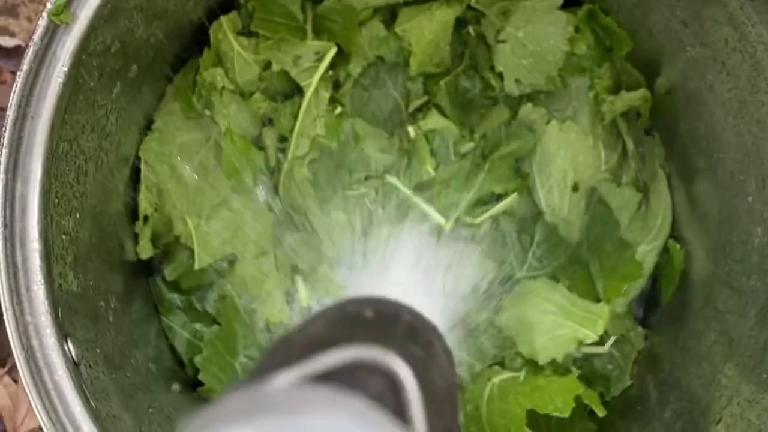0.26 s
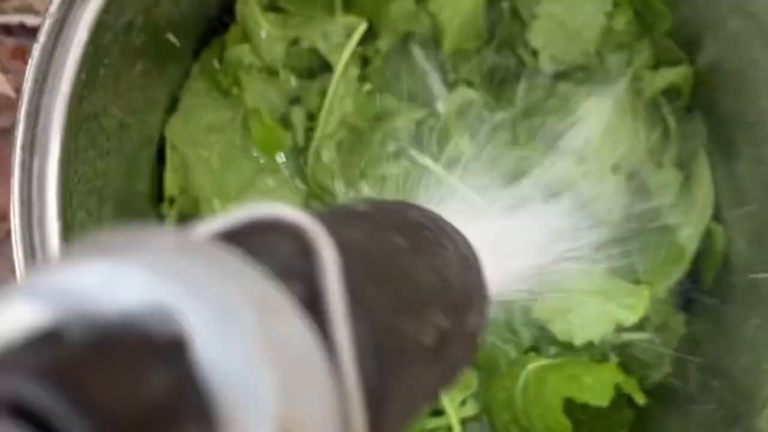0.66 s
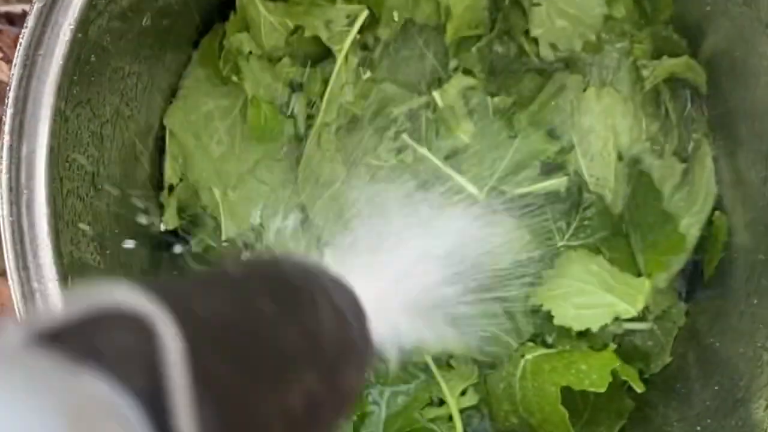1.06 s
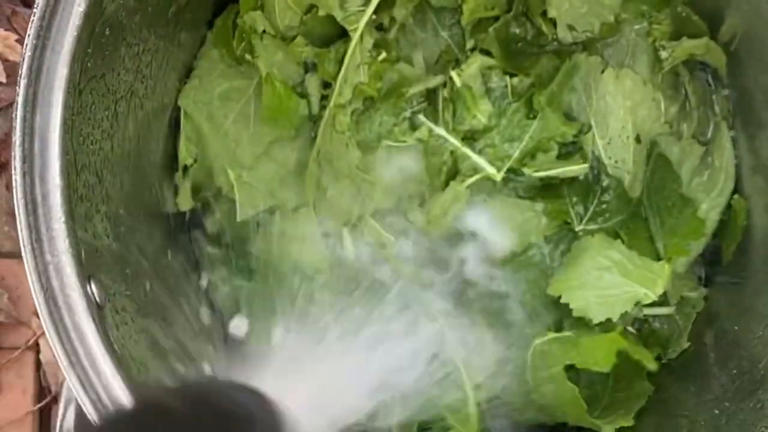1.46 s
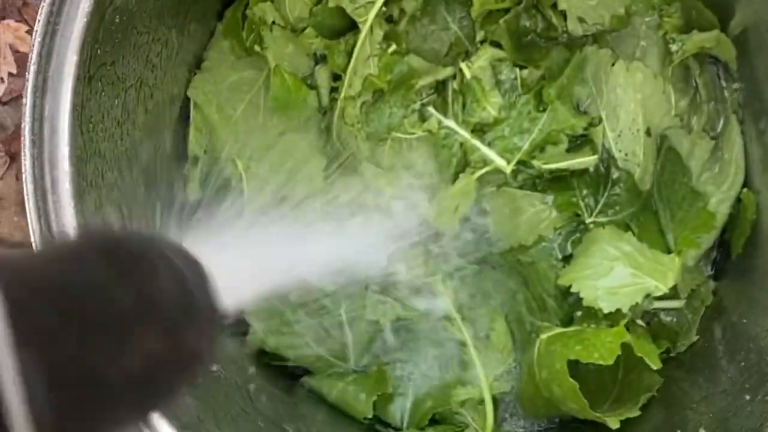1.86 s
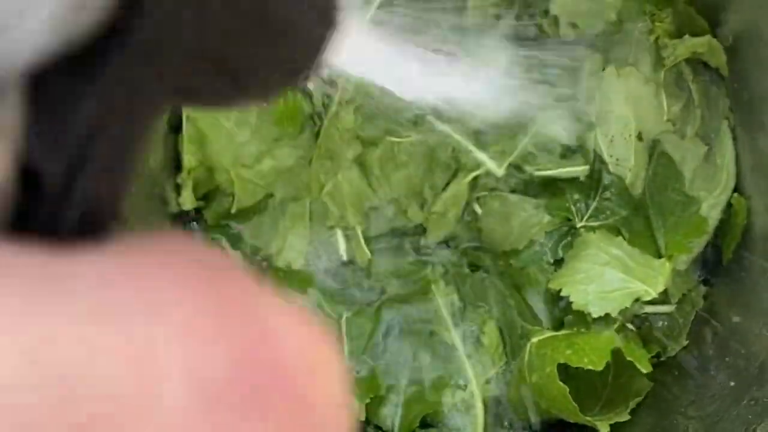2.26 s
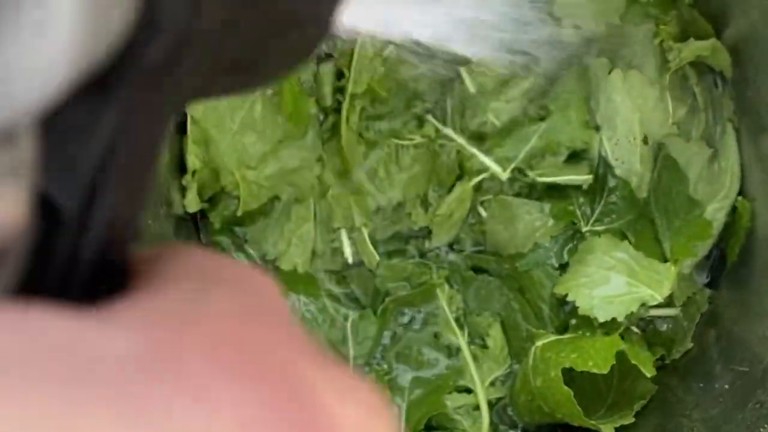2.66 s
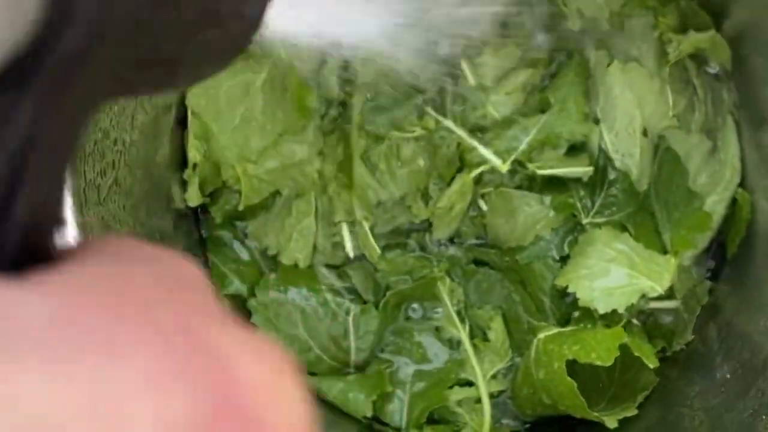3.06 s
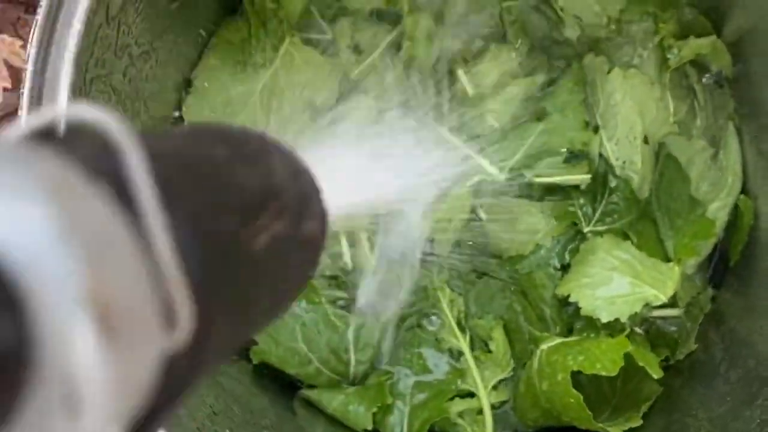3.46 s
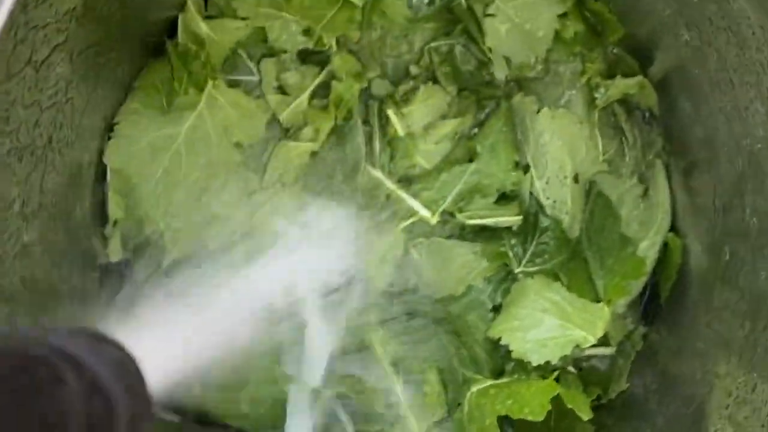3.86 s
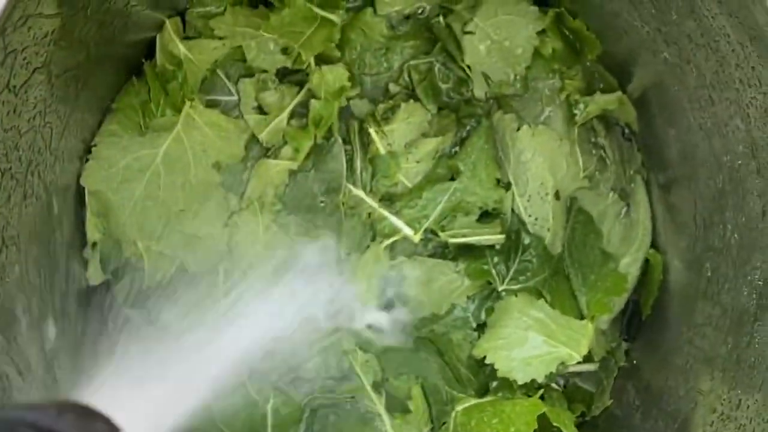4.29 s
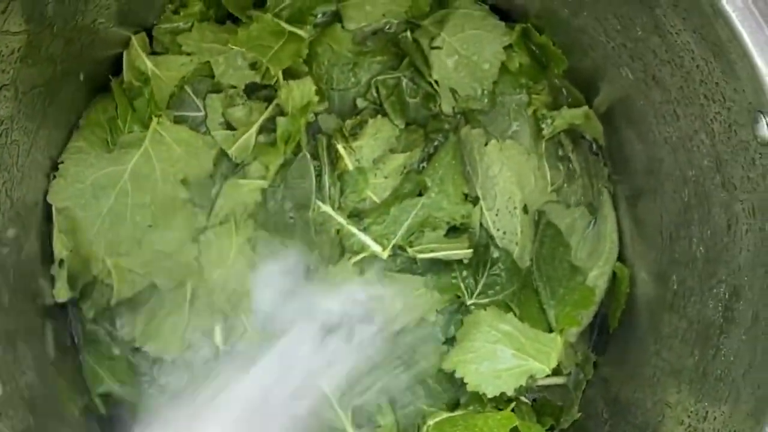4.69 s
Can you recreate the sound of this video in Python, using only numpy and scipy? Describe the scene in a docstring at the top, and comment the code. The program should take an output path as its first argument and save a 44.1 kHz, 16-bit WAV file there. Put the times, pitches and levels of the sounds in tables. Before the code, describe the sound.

A garden hose nozzle hisses steadily up close, its spray pattering on wet leaves and gurgling into water in a large metal pot.

```python
"""Outdoors, within arm's reach: a garden hose sprays a large metal pot full of leaves and water.
The nozzle hisses as dense coloured impacts; drops tick, trap ringing bubbles and make leaves flap and rattle.
Churning water excites the air modes of the pot, and stray spray cracks on its wall.
Low noise and short swings of pressure form the draught of the jet, which buffets a two-port microphone."""
import sys
import numpy as np
from scipy import signal
from scipy.fft import rfft, irfft, next_fast_len
from scipy.io import wavfile
from scipy.ndimage import uniform_filter1d

SR = 44100
rng = np.random.default_rng(int(sys.argv[2]) if len(sys.argv) > 2 else 0)


def to_wav(sig):
    """Store sig (one row per channel, or 1-D mono) as 16-bit WAV at the path in sys.argv[1].

    Samples outside -1..1 are clipped; the rate is SR.
    """
    pcm = np.clip(np.atleast_2d(sig), -1, 1) * 32767
    pcm = np.round(pcm).astype(np.int16)
    wavfile.write(sys.argv[1], SR, pcm.T)  # frames by channels


N = 217633
TIME = np.arange(N) / SR  # seconds
SIZE = next_fast_len(N + SR // 10)  # FFT length in samples

# Nozzle turning past the microphone: time_s, hiss_db, mist_db (mist before its flicker and trim)
NOZZLE_LEVELS = [(0, -34.3, -33.7), (.6, -32.5, -33.2), (.83, -31.7, -31), (1.25, -34.2, -34),
                 (2.1, -32.4, -33.8), (2.7, -35, -31.8), (3.15, -35, -33.6), (3.7, -33.3, -36.6),
                 (4.0, -30.8, -36), (4.25, -33, -38), (4.55, -32.4, -35.2), (4.93, -34.5, -38)]
# Brightest band of the hiss as the nozzle turns: time_s, centre_hz
HISS_CENTRE = [(0, 6550), (.7, 6800), (1.0, 5800), (1.3, 7400), (1.6, 6600), (2.3, 8100), (3.1, 8100),
               (3.5, 7200), (4.9, 7300)]
# Relative spectrum of the hiss: frequency_hz, level_db_per_hz
HISS_SPECTRUM = [(2000, -31), (3900, -16), (4800, -4), (5700, -.8), (7500, 0), (8700, -1), (10100, -9),
                 (11000, -10.5), (13000, -19)]
# Relative spectrum of the fine mist: frequency_hz, level_db_per_hz
MIST_SPECTRUM = [(6000, -28), (8800, -15), (10200, -14), (11200, -11.8), (12800, -12.5), (13900, -7.5),
                 (14800, -1.5), (15700, 1.5), (16100, -40)]
# Brief sizzles of the nozzle: start_s, length_s, level_db
SIZZLES = [(.62, 0.011, -48), (.865, 0.024, -34.5), (1.06, .025, -30.5), (1.5, .42, -50.5),
           (3.39, 0.036, -32)]
SIZZLE_EDGE_S, SIZZLE_HZ = 0.033, 5530
# The jet grazes the wall and spits: start_s, level_db, decay_s
SPITS = [(3.297, -22, .006), (3.306, -24, .006), (3.317, -27.5, .045)]
# Relative spectrum of a spit: frequency_hz, level_db_per_hz
SPIT_SPECTRUM = [(4300, -22), (5900, 0), (7500, -1), (8120, 6), (9400, -4), (11300, -7), (12020, 0),
                 (12700, -9), (15500, 5)]

# How hard the jet bears on the leaves: time_s, patter_db
ON_LEAVES = [(0, -42), (.4, -42.5), (.7, -37), (1.05, -40.5), (1.3, -36), (1.92, -37), (2.05, -42.5),
             (2.26, -35.5), (2.4, -38.5), (2.8, -33), (3.05, -39), (3.16, -39.5), (3.25, -34.5),
             (3.35, -38), (4.2, -45), (4.93, -44.5)]
# Relative spectrum of drops on leaves: frequency_hz, level_db_per_hz
PATTER_SPECTRUM = [(200, -24), (330, 5.5), (700, 2.5), (1150, 3), (2000, -8), (2550, 1), (3000, 4),
                   (4200, 3.5), (5200, -20), (8000, -9.5), (14000, -18)]
# A leaf is caught by the jet and flaps: start_s, length_s, level_db
FLAPS = [(.47, 0.2, -34.5), (.765, 0.041, -30.5), (.8, .3, -38.5), (1.25, 0.096, -44), (2.06, 0.26, -35.5),
         (2.22, 0.047, -26.5), (2.345, 0.057, -27), (2.42, .44, -35), (2.88, 0.27, -39.5),
         (3.22, 0.1, -32.5)]
# Relative spectrum of flapping: frequency_hz, level_db_per_hz
FLAP_SPECTRUM = [(300, -29.5), (550, -6.5), (780, 1), (920, 0.5), (1080, -8), (1350, -11.5), (2500, -20)]
FLAP_EDGE_S, FLAP_REST_DB = 0.014, -44.5  # time to catch and let go; flutter of the other leaves
# The jet hits a leaf square on and it rattles: start_s, length_s, level_db, pitch_hz
RATTLES = [(0.677, 0.027, -36, 3065), (1.54, 0.06, -38, 2680), (1.688, 0.014, -37, 2804),
           (1.828, 0.1, -38.5, 3440), (2.223, 0.033, -39, 4120), (2.625, 0.045, -37.5, 3140),
           (2.772, 0.039, -40.5, 2770), (2.844, .2, -39.5, 2540), (3.201, 0.1, -38.5, 3050)]
RATTLE_EDGE_S, RATTLE_WIDTH_HZ = 0.032, 1400  # width of each of two resonances in series

# How hard the jet digs into the pool: time_s, churning_db
IN_POOL = [(0, -40.5), (.8, -38.5), (1.3, -42.5), (2.3, -37), (2.8, -40), (3.12, -55), (3.35, -42.5),
           (3.9, -37), (4.93, -40)]
# Air mode sounded by the churning: frequency_hz, width_hz
CHURN_MODE = (560, 134)
# Relative spectrum of splashes: frequency_hz, level_db_per_hz
SPLASH_SPECTRUM = [(200, -28.5), (700, -15.5), (1100, 0), (1260, -5), (1470, 2.5), (1640, 5), (1850, 6),
                   (2150, -1.5), (2550, 2.5), (3200, -12.5), (5000, -38.5)]
SPLASH_DB, SPLASH_FOLLOWS = -38.5, 0.17  # level at mean churning; share of the churning's swing
# Ringing of the pot under the splashing: frequency_hz, width_hz, level_db
RING_MODES = [(1800, 75, 0), (1910, 90, -1.5), (2100, 90, -3.5)]
# Level of that ringing: time_s, level_db
RING_LEVEL = [(0, -41.5), (.65, -45), (1.2, -40), (1.5, -43), (1.9, -41.5), (3.2, -47), (3.6, -40),
              (4.0, -42), (4.27, -38.5), (4.5, -42), (4.93, -41)]
# The jet breaks through to open water: start_s, length_s, level_db, pitch_hz
SURGES = [(0.47, .095, -35.5, 1460), (0.784, 0.1, -40, 1583), (1.826, 0.028, -36, 1875),
          (2.502, 0.014, -31.5, 1580), (4.165, 0.06, -40, 1770), (4.2, 0.17, -41.5, 1880),
          (4.626, 0.27, -40.5, 1510)]
SURGE_EDGE_S, SURGE_WIDTH_HZ = .025, 270
BUBBLE_RISE = 0.05  # half the share by which pitch climbs during a 60 dB decay

# Pitch of the pot's hollow note: time_s, pitch_hz
HOLLOW_PITCH = [(0, 260), (.3, 276), (1.2, 253), (2.0, 253), (2.7, 272), (4.93, 268)]
HOLLOW_DB, HOLLOW_FOLLOWS = -48.5, 0.38  # level at mean churning; share of the churning's swing
# Swells of the hollow note: start_s, length_s, level_db
BOOMS = [(.02, 0.062, -36), (.24, 0.071, -38), (1.0, 0.18, -49.5), (1.21, 0.04, -39.5),
         (2.015, 0.013, -40.5), (3.82, 0.37, -50.5), (4.63, 0.087, -44)]
BOOM_EDGE_S = 0.037

# The draught of the jet sweeps over the microphone: start_s, length_s, level_db
GUSTS = [(0, .03, -37.5), (.12, 0.42, -38.5), (.62, 0.21, -42.5), (1.66, 0.084, -39), (1.9, 0.19, -42.5),
         (2.14, 0.089, -39.5), (2.29, 0.11, -40), (2.5, 0.033, -44), (2.82, 0.19, -46.5), (2.95, .11, -35),
         (3.2, 0.17, -51), (3.88, 0.29, -36), (4.2, 0.37, -36), (4.68, 0.21, -38)]
GUST_EDGE_S, CALM_DB = 0.011, -50  # rise and fall; level between gusts
# Relative spectrum of buffeting: frequency_hz, level_db_per_hz
RUMBLE_SPECTRUM = [(15, -53.5), (28, -21.5), (42, 1), (62, 11.5), (90, 3.5), (140, -9.5), (200, -21),
                   (400, -27), (1000, -57)]
# Puffs of air on the microphone: centre_s, level_db, length_s, pitch_hz
PUFFS = [(.205, -29.5, .028, 110), (.368, -29, .03, 62), (.665, -34, .025, 65), (.74, -35, .025, 70),
         (1.115, -38.5, .018, 58), (1.2, -37, .018, 62), (1.422, -29.5, .012, 100), (1.561, -29, .015, 80),
         (1.627, -36, .02, 85), (1.803, -31.5, .016, 62), (2.138, -33, .016, 75), (2.226, -31.5, .013, 106),
         (3.025, -36, .035, 85), (3.129, -25.5, .011, 84), (3.155, -33, .018, 48), (3.632, -36, .014, 100),
         (3.76, -39, .016, 65), (3.985, -29, .03, 92), (4.505, -31.5, .025, 60), (4.806, -32, .022, 90)]
# Relative spectrum of the rush in a puff: frequency_hz, level_db_per_hz
PUFF_SPECTRUM = [(25, -15), (55, -6), (115, -1), (190, 1), (380, -8), (600, -18), (1200, -26)]
THUD_DB, RUSH_DB = -12.5, -6  # thuds against their gust; rush against its puff
PUFF_FALL = .28  # fall in log pitch (base e) per puff length

# Single heavy drops: start_s, level_db (before a common gain), pitch_hz
DROPS = [(.532, -21, 1640), (.786, -21, 1950), (.836, -22, 1650), (.971, -22, 1750), (1.043, -20.5, 1790),
         (1.207, -20.5, 1790), (1.266, -22, 985), (1.309, -21.5, 1700), (1.435, -23, 1890),
         (1.463, -20.5, 2600), (1.5495, -20.5, 2810), (1.589, -19.5, 2850), (1.619, -19.5, 2610),
         (1.688, -21, 2910), (1.854, -22, 1910), (1.860, -20.5, 2120), (1.902, -21, 3700),
         (1.917, -22, 3510), (1.988, -21.5, 1870), (2.168, -23, 1440), (2.502, -21, 1640),
         (2.638, -22, 3710), (2.788, -20, 2910), (2.810, -18.5, 3235), (3.236, -18.5, 2590),
         (3.622, -21.5, 2000), (3.630, -23, 1920), (4.175, -20.5, 1895), (4.193, -19, 1770),
         (4.212, -22, 1830), (4.243, -22, 1790), (4.278, -22, 1860), (4.336, -15, 1850)]
SNAP_CYCLES = 18  # nominal cycles in a 60 dB decay
SPRAY_DB, SPRAY_DECAY_S = -16.5, 0.0022  # droplets thrown off, against level_db of their drop
# Gulps of trapped air: start_s, level_db, pitch_hz
GULPS = [(.572, -20.5, 818), (.756, -20, 900), (.761, -19, 824), (.761, -22, 540), (.770, -22, 576),
         (1.475, -19, 490), (1.609, -23, 554), (1.876, -21.5, 570), (1.884, -25, 480), (2.215, -23.5, 942),
         (2.224, -20, 834), (2.238, -17.5, 856), (2.272, -18.5, 824), (2.347, -20.5, 840),
         (2.358, -19, 974), (2.368, -17.5, 834), (2.392, -20.5, 813), (2.499, -24, 511),
         (2.665, -23.5, 694), (2.827, -22.5, 748), (3.236, -23, 877), (3.277, -22, 872)]

# Stray spray sweeps over the bare pot wall: start_s, length_s, level_db (before a common gain)
WALL_SWEEPS = [(1.4, 0.47, -36.5), (2.72, 0.52, -37)]
# Relative spectrum of drops on bare metal: frequency_hz, level_db_per_hz
WALL_SPECTRUM = [(400, -10.5), (1300, 10), (2800, 14), (5000, -6.5), (7500, 1.5), (10500, -4.5),
                 (13000, -5), (15500, -3.5), (16500, -24)]
WALL_EDGE_S, WALL_REST_DB = 0.029, -56  # rest level also before the common gain

# Phase between the microphone ports: frequency_hz, left_lead_rad
PORT_PHASE = [(30, 0), (300, .3), (690, .6), (1100, 0), (2000, -.25), (2580, -.9), (3100, -.2),
              (3900, -.35), (4740, -1.3), (5080, -1.9), (5300, -np.pi), (13000, -np.pi), (15300, -2.5)]
# Level between the ports: frequency_hz, left_minus_right_db
PORT_BALANCE = [(100, 0), (480, .7), (750, 4), (1280, 5.5), (1700, 1), (2900, .3), (3600, 2), (5000, 0)]
# Coherence for equally strong direct and scattered sound: frequency_hz, likeness_0_to_1
PORT_LIKENESS = [(50, .98), (150, .94), (300, .98), (900, .97), (1900, .92), (3200, .86), (4300, .55),
                 (5000, .7), (5600, 1), (13000, 1), (14500, .8)]
CUTOFF_HZ = 15750


def from_db(db):
    """Level definition: an amplitude ratio is ten to the power of decibels over twenty."""
    return 10 ** (np.asarray(db) / 20)


def rms_one(x):
    """Power normalisation: division by the root mean square."""
    return x / np.sqrt(np.mean(x ** 2) + 1e-20)


def over_time(rows):
    """Linear interpolation of a two-column time curve at every sample."""
    return np.interp(TIME, *np.transpose(rows))


def gains(rows):
    """Level interpolation: each decibel column becomes a gain per sample."""
    s, *columns = np.transpose(rows)
    return [from_db(np.interp(TIME, s, column)) for column in columns]


def per_bin(points):
    """Interpolation over log frequency, read at every FFT bin."""
    hz, value = np.transpose(points)
    bin_hz = np.arange(SIZE // 2 + 1) * SR / SIZE
    return np.interp(np.log(bin_hz + 1), np.log(hz), value)


def colour(x, spectrum):
    """Linear filtering: multiplication in frequency shapes the spectrum; rms 1."""
    shaped = rfft(x, SIZE) * from_db(per_bin(spectrum))
    return rms_one(irfft(shaped, SIZE)[..., :N])


def drift(rate):
    """Random modulation: interpolated Gaussian knots, `rate` per second, scaled to rms 1."""
    knots = rng.standard_normal(4000)
    return rms_one(np.interp(TIME * rate, np.arange(len(knots)), knots))


def swells(rows, edge_s, rest_db=-120):
    """Power addition: events rise, hold and fall over a resting level."""
    power = from_db(rest_db) ** 2
    for start, length, db in rows:
        outside_s = np.abs(TIME - start - length / 2) - length / 2
        power = power + (from_db(db) * np.clip(1 - outside_s / edge_s, 0, 1)) ** 2
    return np.sqrt(power)


def decay_after(s, decay_s):
    """Exponential decay: amplitude falls by a factor e in each decay time after onset."""
    return (TIME > s) * np.exp(-np.abs(TIME - s) / decay_s)


def steady(x, window_s):
    """Level compression: division by slow local rms evens a stream but keeps its grain."""
    size = max(int(window_s * SR), 2)
    power = uniform_filter1d(uniform_filter1d(x * x, size), size)
    return rms_one(x / np.sqrt(np.abs(power) + 1e-3 * np.mean(x * x)))


def impacts(per_s, spread_db, clump_db, clump_rate):
    """Modulated shot noise: direct and scattered streams of many small and few large drop impacts."""
    sizes = from_db(spread_db * np.minimum(rng.exponential(1, (2, N)), 4.5))
    signs = rng.choice([-1, 1], (2, N))
    born = rng.random((2, N)) < per_s / SR
    return sizes * signs * born * from_db(clump_db * drift(clump_rate))


def wall_echoes(x, share, count=4):
    """Comb filtering: millisecond wall paths change as the hand moves, so the colour swirls."""
    out = x
    for lag_s in np.geomspace(.0009, .0042, count):
        delay_s = lag_s * rng.uniform(0.864, 1.141) * from_db(0.723 * drift(4))
        echo = np.array([np.interp(TIME - delay_s, TIME, stream) for stream in x])
        out = out + share * echo
    return rms_one(out)


def moving_band(centre_hz, width_hz):
    """Frequency translation: a moving carrier shifts low-passed complex noise; rms 1."""
    white = rng.standard_normal((2, N)) + 1j * rng.standard_normal((2, N))
    low_pass = signal.butter(2, width_hz / 2, fs=SR, output="sos")
    carrier = np.exp(2j * np.pi * np.cumsum(centre_hz) / SR)
    return rms_one((signal.sosfilt(low_pass, white) * carrier).real)


def resonate(x, hz, width_hz):
    """Damped resonance: a pole pair sets pitch and bandwidth, with gain near 1 at the peak."""
    r = np.exp(-np.pi * width_hz / SR)
    zeros = np.array([1, 0, -1]) * (1 - r * r) / 2
    poles = [1, -2 * r * np.cos(2 * np.pi * hz / SR), r * r]
    return signal.lfilter(zeros, poles, x + 1e-18)


def bubbles(clicks, low_hz, high_hz, cycles):
    """Bubble resonance: each impact excites a random pitch that decays 60 dB while rising."""
    pitch = low_hz * (high_hz / low_hz) ** rng.random(N)
    age = np.arange(int(cycles / low_hz * SR)) / SR
    out = np.zeros((2, N + len(age)))
    for stream, i in zip(*np.nonzero(clicks)):
        life = age * pitch[i] / cycles
        turns = cycles * life * (1 + BUBBLE_RISE * life)
        ring = np.cos(2 * np.pi * turns) * np.exp(-np.log(1000) * life)
        out[stream, i:i + len(age)] += clicks[stream, i] * np.sqrt(pitch[i]) * ring
    return rms_one(out[:, :N])


def nozzle():
    """Jet breakup: dense drop impacts hiss and mist, wall echoes swirl them, and grazing spits."""
    hiss, mist = gains(NOZZLE_LEVELS)
    jet_drops = impacts(per_s=12000, spread_db=3.2, clump_db=.7, clump_rate=30)
    jet = colour(wall_echoes(jet_drops, share=.2), HISS_SPECTRUM)
    sheen = moving_band(over_time(HISS_CENTRE), width_hz=1100) * from_db(-7.5 + 1.5 * drift(14))

    mist_drops = impacts(per_s=9000, spread_db=3.7, clump_db=1.2, clump_rate=45)
    fine = colour(wall_echoes(mist_drops, share=.22), MIST_SPECTRUM)
    flicker = from_db(drift(14) + .4)

    sizzle = swells(SIZZLES, SIZZLE_EDGE_S) * moving_band(np.full(N, SIZZLE_HZ), width_hz=1600)
    spit_gain = sum(from_db(db) * decay_after(s, decay) for s, db, decay in SPITS)
    spit = spit_gain * colour(rng.standard_normal((2, N)), SPIT_SPECTRUM)
    return hiss * (jet + sheen) + sizzle + mist * flicker * fine + spit


def leaf_rattles():
    """Resonant impact: a leaf hit square on rattles in a broad band at its own pitch."""
    hits = impacts(per_s=1500, spread_db=3, clump_db=1.5, clump_rate=90)
    out = 0
    for *event, hz in RATTLES:
        band = resonate(resonate(hits, hz, RATTLE_WIDTH_HZ), hz, RATTLE_WIDTH_HZ)
        out = out + swells([event], RATTLE_EDGE_S) * steady(band, window_s=0.033)
    return out


def leaves():
    """Impact excitation: drops tick and trap bubbles; leaves hit square on rattle, at the edge flap."""
    tick_drops = impacts(per_s=2400, spread_db=4.2, clump_db=1.5, clump_rate=70)
    ticks = colour(wall_echoes(tick_drops, share=0.3), PATTER_SPECTRUM)
    bubble_drops = impacts(per_s=420, spread_db=2.6, clump_db=2.5, clump_rate=35)
    spatter = bubbles(bubble_drops, low_hz=2200, high_hz=4700, cycles=65)
    patter = steady(from_db(-3.0) * ticks + from_db(-5.0) * spatter, window_s=0.36)

    flap_hits = impacts(per_s=900, spread_db=0.0, clump_db=1.1, clump_rate=90)
    flap = steady(colour(flap_hits, FLAP_SPECTRUM), window_s=0.088)
    flapping = swells(FLAPS, FLAP_EDGE_S, FLAP_REST_DB) * flap
    return gains(ON_LEAVES)[0] * patter + leaf_rattles() + flapping


def with_churning(db, share):
    """Proportional coupling: level follows a share of the churning's swing about its mean."""
    churn_db = over_time(IN_POOL)
    return from_db(db + share * (churn_db - churn_db.mean()))


def water():
    """Cavity excitation: splashes and bubbles sound the pot; each surge has its own pitch."""
    slaps = wall_echoes(impacts(per_s=1600, spread_db=2.5, clump_db=1.1, clump_rate=49), share=0.21)
    fizz_drops = impacts(per_s=410, spread_db=4.5, clump_db=-3.0, clump_rate=24)
    fizz = bubbles(fizz_drops, low_hz=1386, high_hz=2452, cycles=79)
    splash_mix = from_db(-3.5) * colour(slaps, SPLASH_SPECTRUM) + from_db(-6.5) * fizz
    splash = with_churning(SPLASH_DB, SPLASH_FOLLOWS) * steady(splash_mix, window_s=0.23)

    knocks = impacts(per_s=860, spread_db=1.6, clump_db=2.4, clump_rate=48)
    modes = 0
    for k, (hz, width, db) in enumerate(RING_MODES):
        modes = modes + (-1) ** k * from_db(db) * resonate(knocks, hz, width)  # alternate signs
    ring = gains(RING_LEVEL)[0] * steady(modes, window_s=0.33)
    surges = 0
    for *event, hz in SURGES:
        band = steady(resonate(knocks, hz, SURGE_WIDTH_HZ), window_s=.04)
        surges = surges + swells([event], SURGE_EDGE_S) * band

    plunges = impacts(per_s=700, spread_db=1.0, clump_db=-0.35, clump_rate=9.8)
    air_mode = rms_one(resonate(plunges, *CHURN_MODE))
    gurgle_drops = impacts(per_s=250, spread_db=3.5, clump_db=-1.0, clump_rate=58)
    gurgle = bubbles(gurgle_drops, low_hz=373.0, high_hz=688, cycles=16.4)
    deep = steady(air_mode + from_db(-4.5) * gurgle, window_s=.1)
    return splash + ring + surges + gains(IN_POOL)[0] * deep


def hollow():
    """Cavity resonance: the lowest air mode hums with the churning, shifts in pitch and booms."""
    hum = steady(moving_band(over_time(HOLLOW_PITCH), width_hz=36), window_s=.05)
    hum_gain = with_churning(HOLLOW_DB, HOLLOW_FOLLOWS) * from_db(2.4 * drift(12))
    return np.hypot(hum_gain, swells(BOOMS, BOOM_EDGE_S)) * hum  # powers add


def thump(s, length_s, hz):
    """Eddy pressure: swings in a Gaussian envelope of height 1 sink in pitch as an eddy passes."""
    age = np.clip((TIME - s) / length_s, -4, 4)
    turns = np.cumsum(hz * np.exp(-PUFF_FALL * age)) / SR
    return np.exp(-age ** 2) * np.sin(2 * np.pi * (turns + rng.random((2, 1))))


def draught():
    """Turbulent pressure: gusts buffet with small thuds; puffs thump and rush at their crest."""
    gusts = swells(GUSTS, GUST_EDGE_S, CALM_DB)
    buffet = steady(colour(rng.standard_normal((2, N)), RUMBLE_SPECTRUM), window_s=.08)
    thud_hits = impacts(per_s=40, spread_db=1.2, clump_db=1, clump_rate=5)
    thuds = bubbles(thud_hits, low_hz=85, high_hz=165, cycles=6)  # the same damped tones, far lower

    thumps = sum(from_db(db) * thump(s, length, hz) for s, db, length, hz in PUFFS)
    crests = sum(from_db(db) * np.exp(-((TIME - s) / length / .5) ** 2) for s, db, length, hz in PUFFS)
    rush = steady(colour(rng.standard_normal((2, N)), PUFF_SPECTRUM), window_s=.013)
    buffeting = gusts * (from_db(-2.0) * buffet + from_db(THUD_DB) * thuds)
    return buffeting + thumps + from_db(RUSH_DB) * crests * rush


def plop(s, hz, cycles, rise):
    """Damped oscillation: a tone under an envelope starting at 1 rises in pitch as it dies."""
    age = np.clip((TIME - s) * hz / cycles, 0, 2)
    return np.sin(2 * np.pi * cycles * age * (1 + rise * age)) * np.exp(-np.log(1000) * age)


def big_drops():
    """Transient excitation: heavy drops snap on leaves and throw droplets; air pockets gulp under the jet."""
    snaps = sum(from_db(db + 1.0) * plop(s, hz, cycles=SNAP_CYCLES, rise=0.04) for s, db, hz in DROPS)
    burst_gain = sum(from_db(db + SPRAY_DB) * decay_after(s, SPRAY_DECAY_S) for s, db, hz in DROPS)
    droplets = burst_gain * colour(rng.standard_normal(N), PATTER_SPECTRUM)
    gulps = sum(from_db(db) * plop(s, hz, cycles=17, rise=0.043) for s, db, hz in GULPS)
    return (snaps + droplets + gulps) * np.array([[1], [0]])  # direct stream only


def wall():
    """Impact noise: separate drops crack against the bare metal in quick flurries."""
    cracks = impacts(per_s=700, spread_db=2.8, clump_db=3, clump_rate=45)
    sweep = swells(WALL_SWEEPS, WALL_EDGE_S, WALL_REST_DB)
    return from_db(-2) * sweep * colour(cracks, WALL_SPECTRUM)


def ports(x):
    """Two-point coherence: ports share direct sound, differ in scattered, and oppose in the treble."""
    direct, scattered = rfft(x, SIZE)
    alike = np.clip(per_bin(PORT_LIKENESS), 0, 1)
    sides = np.array([[1], [-1]])  # left, right
    pair = np.sqrt((1 + alike) / 2) * direct + sides * np.sqrt((1 - alike) / 2) * scattered
    balance = from_db(sides * per_bin(PORT_BALANCE) / 2)
    phase = np.exp(1j * sides * per_bin(PORT_PHASE) / 2)
    return irfft(pair * balance * phase, SIZE)[:, :N]


def scene():
    """Superposition: all sources add as direct and scattered streams before reaching the ports."""
    spray = nozzle() + leaves() + wall()
    pool = water() + hollow()
    return ports(spray + pool + big_drops() + draught())


def record(dry):
    """Band limitation: a steep elliptic low-pass cuts the top."""
    return signal.sosfilt(signal.ellip(14, .1, 80, CUTOFF_HZ, fs=SR, output="sos"), dry)


dry = scene()
out = record(dry)
to_wav(out)
```